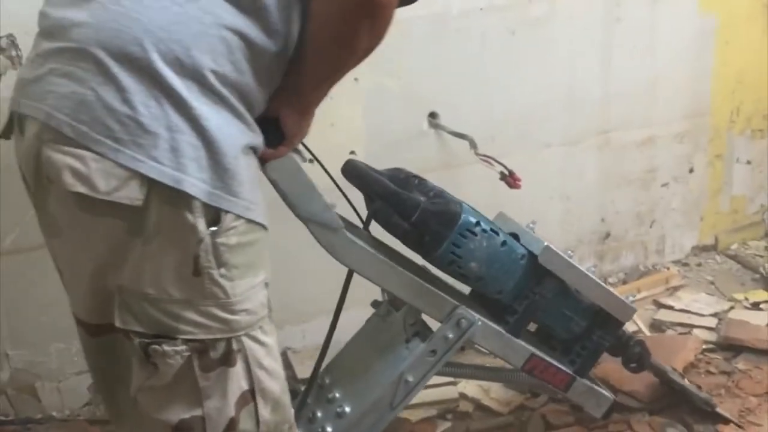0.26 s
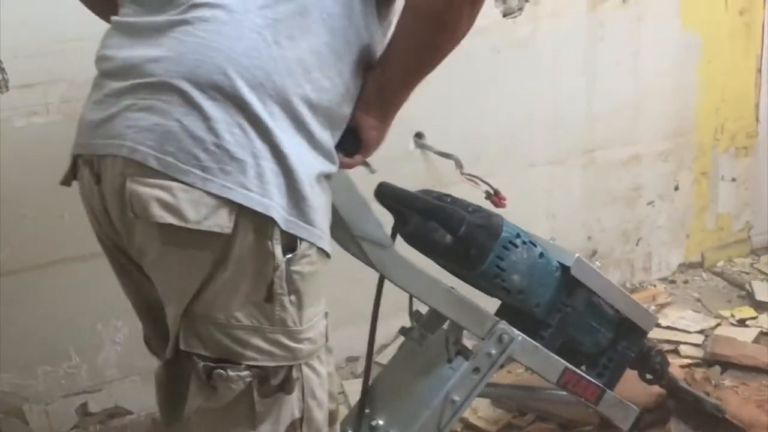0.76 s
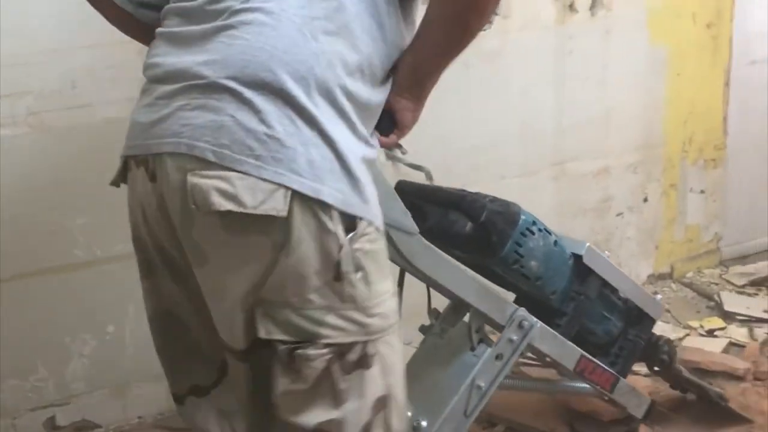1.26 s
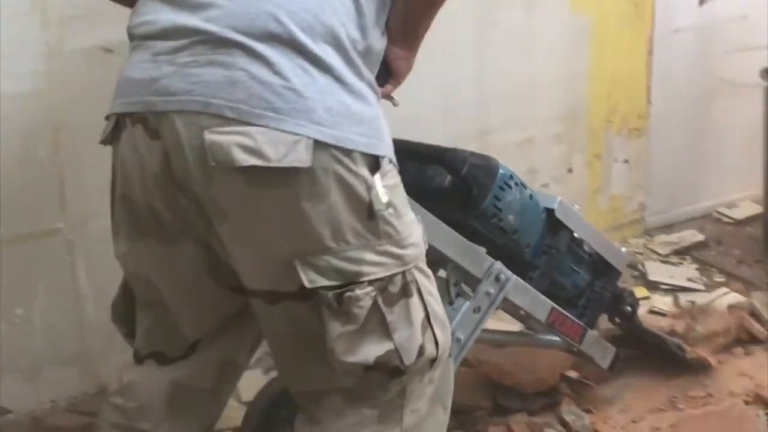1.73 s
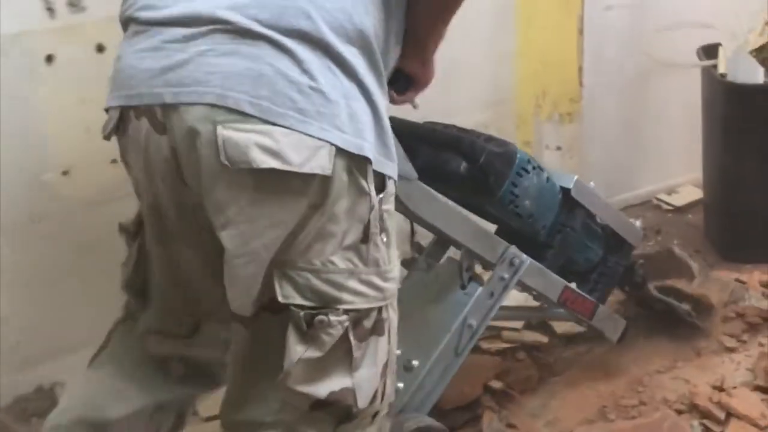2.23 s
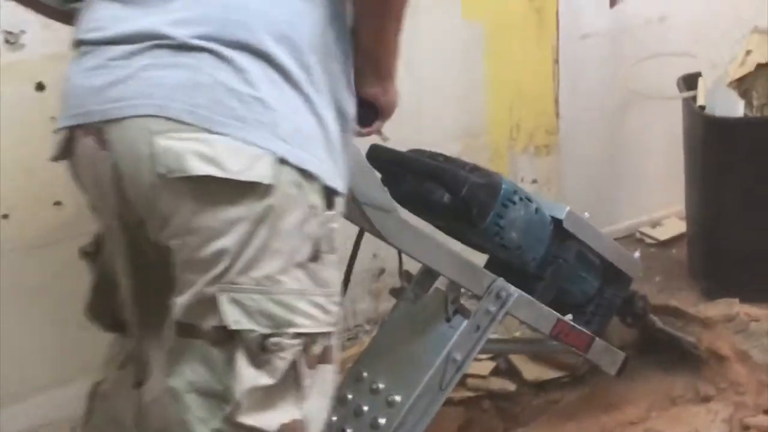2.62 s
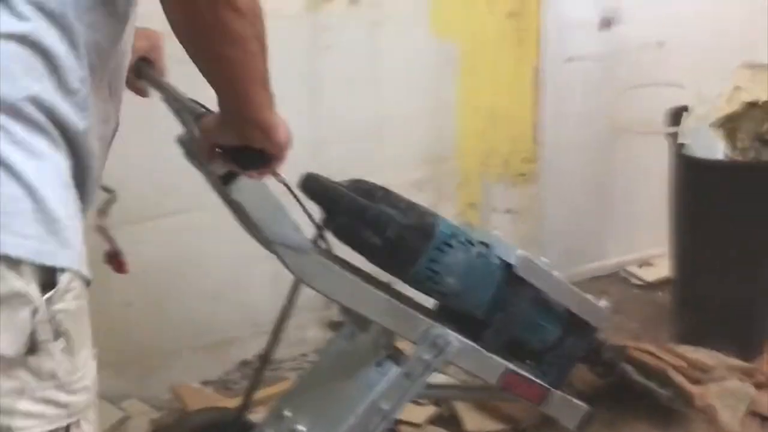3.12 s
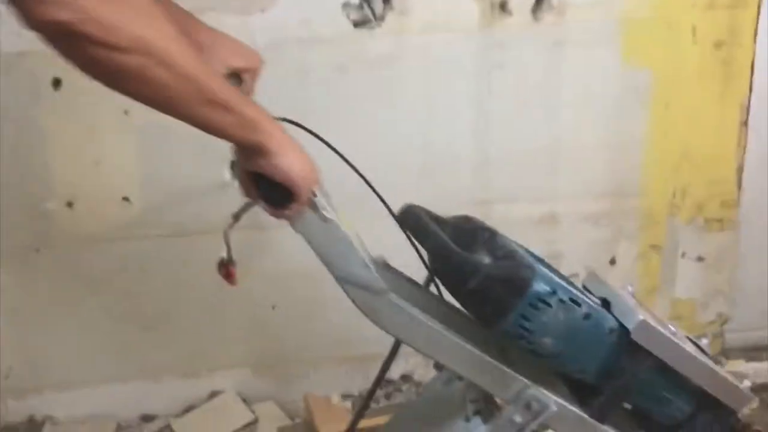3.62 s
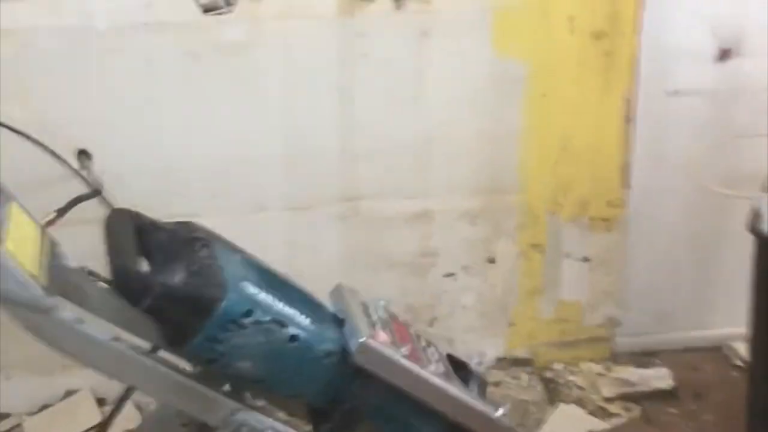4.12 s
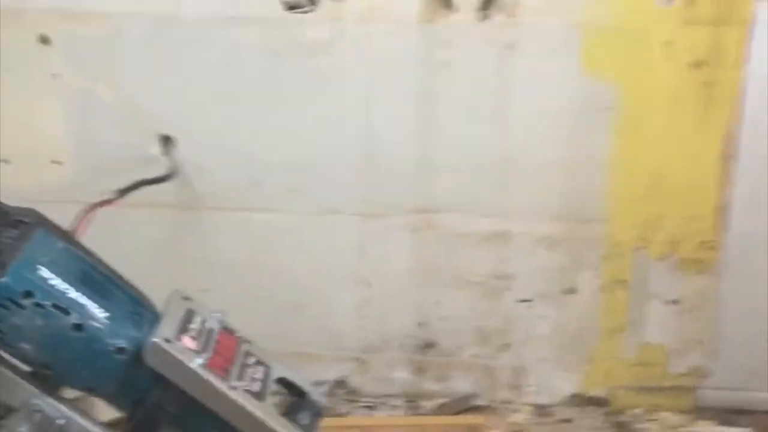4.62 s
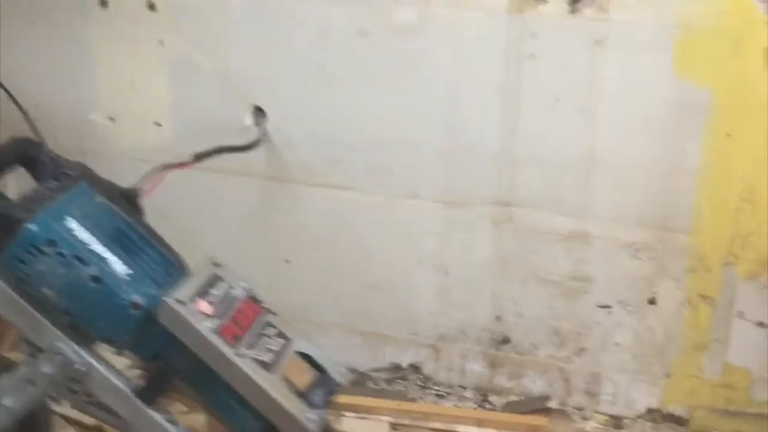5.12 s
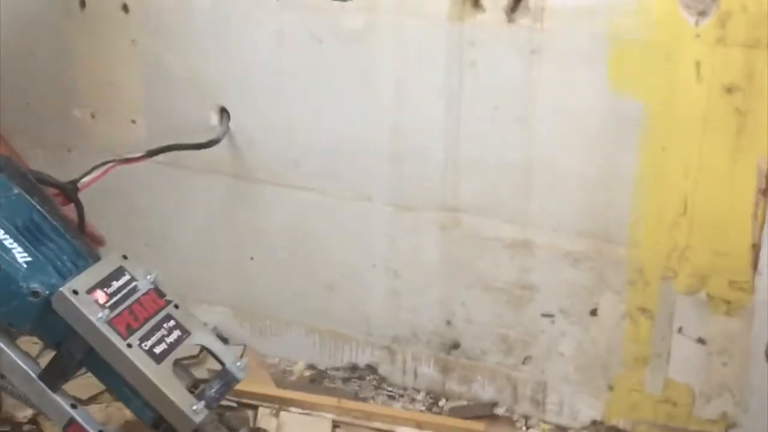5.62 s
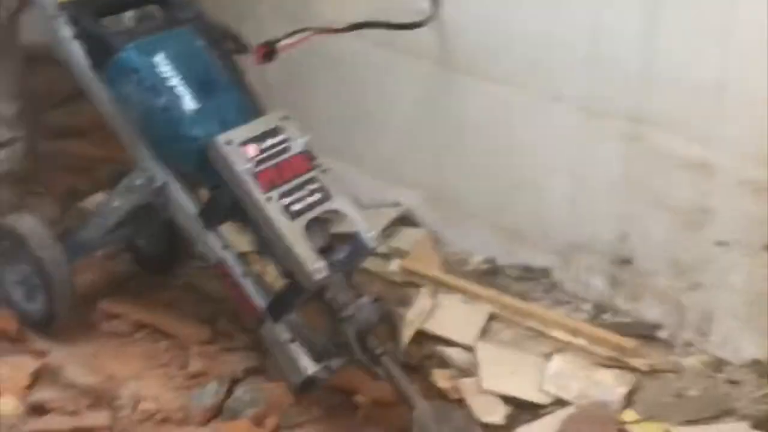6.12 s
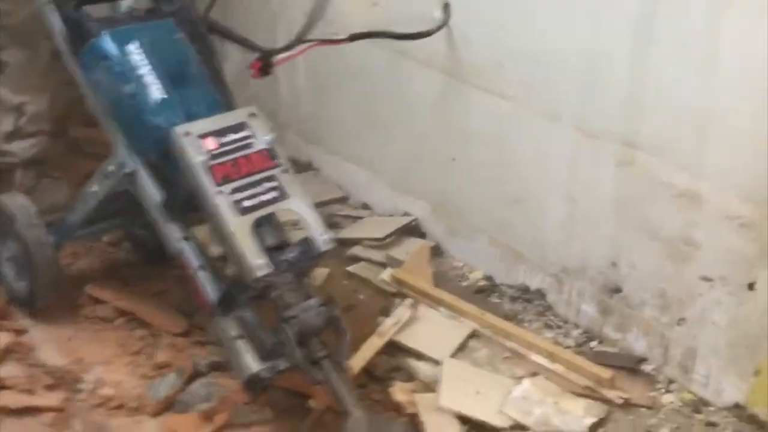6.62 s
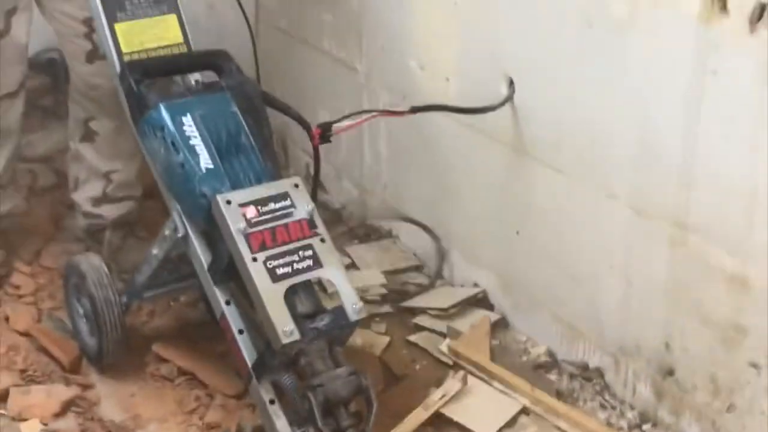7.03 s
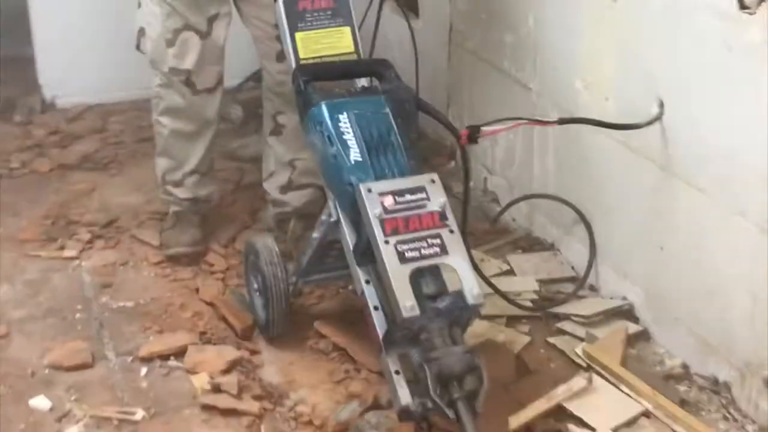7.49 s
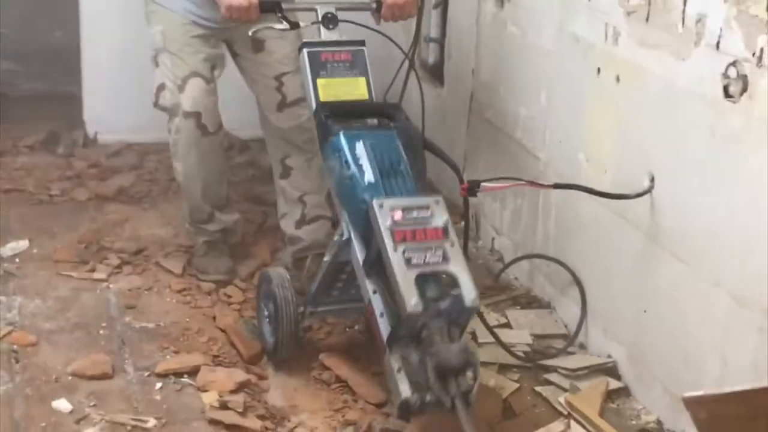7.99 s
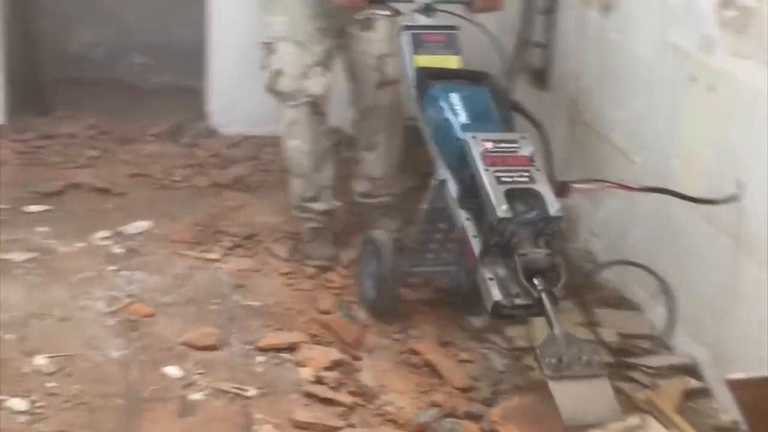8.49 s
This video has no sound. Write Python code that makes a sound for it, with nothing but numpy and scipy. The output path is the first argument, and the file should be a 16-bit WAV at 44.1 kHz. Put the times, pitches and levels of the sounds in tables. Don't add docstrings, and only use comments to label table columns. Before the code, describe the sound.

One handheld microphone close to an electric hammer chipping floor tiles indoors. Brief free-running clatter gives way to machine-gun bursts of brittle cracks with steel ringing, slab thuds and debris, separated by tiny gaps. Then the blows stop and the machine keeps knocking and whining, its cart jingling with a clear ringing tone, getting more plate-like in the bare room's echo.

```python
import sys
import numpy as np
from scipy import signal
from scipy.fft import rfft, irfft, next_fast_len
from scipy.io import wavfile
from scipy.ndimage import uniform_filter1d

SR = 44100
rng = np.random.default_rng(int(sys.argv[2]) if len(sys.argv) > 2 else 0)


def boost(x):
    u = np.asarray(x, float) / 20
    return 10 ** u


def inscribe(sig):
    pcm = np.round(np.clip(np.atleast_2d(sig).T, -1, 1) * 32767)
    wavfile.write(sys.argv[1], SR, pcm.astype(np.int16))


N = 385875
T = np.arange(N) / SR
RECOVER_FROM_S = 3.57


def rms_one(x):
    return x / np.sqrt(np.mean(x ** 2) + 1e-20)


def at_hz(points, hz):
    f, value = np.array(points).T[:2]
    return np.interp(np.log(hz + 1), np.log(f), value)


def coloured(x, spectrum):
    size = next_fast_len(N)
    gain = boost(at_hz(spectrum, np.fft.rfftfreq(size, 1 / SR)))
    return rms_one(irfft(rfft(x, size) * gain, size)[:N])


def resonate(x, hz, width_hz):
    r = np.exp(-np.pi * width_hz / SR)
    poles = [1, -2 * r * np.cos(2 * np.pi * hz / SR), r * r]
    return signal.lfilter([1, 0, -1], poles, x + 1e-18) * (1 - r * r) / 2


def resonate_twice(x, hz, width_hz):
    return resonate(resonate(x, hz, width_hz), hz, width_hz)


def drift(rate_hz):
    r = np.exp(-2 * np.pi * rate_hz * 40 / SR)
    slow = signal.lfilter([1], [1, -2 * r, r * r], rng.standard_normal(N // 40 + 2002))[2000:]
    return np.interp(np.arange(N) / 40, np.arange(len(slow)), rms_one(slow - slow.mean()))


def grit(per_s, spread_db):
    sizes = boost(spread_db * np.minimum(rng.exponential(1, N), 5)) * rng.choice([-1, 1], N)
    return rms_one(sizes * (rng.random(N) < per_s / SR))


def dying(s, levels, t60):
    marks = np.zeros(N)
    marks[(s * SR).astype(int)] = levels
    return signal.lfilter([1], [1, -boost(-60 / (t60 * SR))], marks)


def swells(rows, width_s):
    return sum(db * np.exp(-((T - s) / width_s) ** 2) for s, db in rows)


# first t/s, last t/s, crack peak level/dB, slab thud relative level/dB, drag of last blow/s
BURSTS = [
    (0.6216, 0.797, -4.5, -9.5, 0.0072),
    (0.844, 1.18, -10, -11, .008),
    (1.3415, 1.475, -5, -22, 0.012),
    (1.7572, 1.9883, -6.5, -28.5, 0.021),
    (2.09, 2.9226, -10.5, -13, .006),
    (3.1177, 3.335, -9.5, -16, 0.0094),
]
# t/s, crack peak level/dB
STRAY_BLOWS = [
    (0.5676, -15.5),
    (1.215, -28.5),
    (1.295, -25),
    (1.515, -34),
    (1.71, -24.5),
]


def blows():
    blows_per_s, late_s, soft_db = 23.7, .003, 5
    drag_blows, soft_db_per_ms = 1.4, .5
    rows = [(s, db, -20, db - 1.5) for s, db in STRAY_BLOWS]
    ended = STRAY_BLOWS[0][0]
    for first, last, level_db, thud_db, drag_s in BURSTS:
        k = np.arange(round((last - first - drag_s) * blows_per_s) + 1)
        chance = rng.standard_normal((len(k), 4))
        opening = (k == 0) * (first - ended > 2 / blows_per_s)
        drag = drag_s * np.exp((k - k[-1]) / drag_blows)
        even = np.linspace(first - late_s * opening[0] - drag[0], last - drag_s, len(k))
        scatter = 0.0011 * chance[:, 0] * (k > 0) * (k < k[-1])
        s = even + late_s * opening + drag + scatter
        loss_db = soft_db * opening + soft_db_per_ms * drag / .001 + 1.5 * chance[:, 1]
        debris_db = level_db - 7.5 - 0.64 * loss_db - 1 * opening + 1.5 * chance[:, 3]
        rows += zip(s, level_db - loss_db, thud_db + 7.5 * chance[:, 2], debris_db)
        ended = last
    return np.transpose(rows)


def tile_crack(s, crack_db):
    onset = dying(s, boost(crack_db + 1), 0.028) - dying(s, boost(crack_db + 2), 0.0027)
    crack = rng.standard_normal(N) * onset
    luck = rng.standard_normal((len(s), 2))
    bounce_s = .009 * boost(3.0 * luck[:, 0])
    again = dying(s + bounce_s, boost(crack_db - 6.5 + 2.8 * luck[:, 1]), 0.025)
    first = np.abs(s[:, None] - np.array(BURSTS)[2:, 0]).min(1) < 1e-3
    tick = dying(s, first * boost(crack_db), 0.0095)
    return crack + rng.standard_normal(N) * (again + tick)


# f/Hz, width/Hz, level/dB
CHISEL = [(1900, 130, -6.5), (3060, 310, 0.5), (3860, 88, -13), (4236, 110, -1.5), (4800, 89, 3),
          (5750, 160, -1.5), (6750, 170, -7), (7650, 180, -0.5), (9630, 230, -8.5), (11400, 180, -1),
          (12600, 200, -25)]


def chisel_ring(push):
    return sum((-1) ** k * boost(db) * resonate(push, hz, width) * np.sqrt(1000 / width)
               for k, (hz, width, db) in enumerate(CHISEL))


# f/Hz, spectral density level/dB per Hz
SHATTER = [(18, -65), (30, -26.5), (455, -20.5), (694, -3.5), (1210, -8.5), (2220, -5.5), (3050, -4),
           (3570, -4), (4770, -5), (5160, -2.5), (14100, -25), (15200, -20), (16500, -41)]


def flying_shards(clatter):
    return coloured(grit(8000, spread_db=3.0), SHATTER) * clatter


def slab_thud(s, thud_db):
    push = rng.standard_normal(N) * dying(s, boost(thud_db), 0.16)
    return resonate_twice(push, 740, 580)


def chipping():
    s, crack_db, thud_db, debris_db = blows()
    crack = tile_crack(s, crack_db)
    clatter = dying(s, boost(debris_db), 0.18)
    debris = grit(6000, spread_db=2.5) * clatter
    bright = signal.sosfilt(signal.butter(2, 2500, "high", fs=SR, output="sos"), crack)
    steel = chisel_ring(crack + 0.67 * debris)
    slab = slab_thud(s, crack_db + thud_db)
    boom = resonate_twice(debris, 290, 126)
    direct = boost(-2.5) * bright + boost(-2) * flying_shards(clatter) + boost(0.5) * steel
    direct = direct + boost(6.5) * slab + boost(-2) * boom
    return direct + boost(-2.0) * room(direct)


# f/Hz, spectral density level/dB per Hz
RATTLE = [(18, -60), (30, -34.5), (350, -13.5), (409, -15.5), (858, -5.5), (1240, -8.5), (1340, -5.5),
          (1450, -9.5), (3210, -5), (3970, -8.5), (4530, -2.5), (4900, -10.5), (14100, -28), (15200, -26),
          (16500, -64)]
# f/Hz, width/Hz, level/dB
FRAME = [(1953, 66, -24.5), (3175, 160, -16), (4500, 100, -41), (5400, 220, -25), (6090, 120, -19.5),
         (8380, 1100, -17), (11640, 440, -26.5)]


def frame_rattle(contacts, plate_db):
    body = coloured(contacts, RATTLE)
    body = body + sum(boost(db) * rms_one(resonate(contacts, hz, width)) for hz, width, db in FRAME)
    body = body + boost(plate_db - 5.0) * rms_one(resonate_twice(contacts, 1093, 450))
    return rms_one(boost(-1.5) * rms_one(body) + rms_one(room(body)))


def cart_plate(contacts, plate_db):
    pair = resonate(contacts, 1097, 30) - boost(-0.5) * resonate(contacts, 1019, 35)
    return boost(plate_db - 10.5) * rms_one(pair)


# t/s, level above its hum/dB
JOLTS = [(.52, 6), (3.92, 17), (4.13, 13), (4.37, 5), (4.58, 2), (5.15, 6), (5.75, 4), (6.0, 6), (6.5, 9),
         (7.22, 9), (7.6, 9.5), (7.87, 12), (8.1, 7.5), (8.4, 10), (8.55, 9.5)]


def cart_tube(contacts, freed):
    rise_s = np.minimum(freed, 5.97 - RECOVER_FROM_S)
    ring_db = -18.5 + 4.5 * rise_s + swells(JOLTS, .051)
    tube = resonate(contacts, 1354, 11)
    power = uniform_filter1d(rms_one(tube) ** 2 + .05, size=3000)
    return boost(ring_db - 4.1) * rms_one(tube / power ** 0.29)


# t/s, level/dB
WHINE_SWELLS = [
    (.08, 8),
    (4.13, 5),
    (4.55, 5),
    (5.41, 4.5),
    (5.62, 11.5),
    (6.52, 3),
    (6.9, 7),
    (7.54, 3),
]


def gear_whine(freed, ducked, turn):
    hz = np.where(freed > 0, 4704 - 30 * freed, 4676)
    db = -28.5 - 22.5 * ducked - 0.55 * freed + swells(WHINE_SWELLS, .078)
    cycles = np.cumsum(hz + 9.96 * drift(26.6) + 14 * drift(1.5)) / SR
    mesh = 2 * np.pi * cycles + 0.5 * np.sin(2 * np.pi * turn)
    return boost(db + 2.0 + 3.8 * drift(27.0)) * np.sin(mesh)


# f/Hz, width/Hz, relative level/dB
HUM = [(63.6, 12, -42.5), (256.4, 5.3, -43.5), (169, 9.4, -48.5)]


def floor_hum(contacts):
    rise_db = 1.5 * np.abs(T - RECOVER_FROM_S)
    return sum(boost(db + rise_db) * rms_one(resonate_twice(contacts, hz, width)) for hz, width, db in HUM)


def free_running():
    freed = np.maximum(T - RECOVER_FROM_S, 0)
    ducked = (1 - np.exp(-np.maximum(T - 0.78, 0) / 0.14)) * np.exp(-freed / 0.32)
    level_db = -17.5 - 16.5 * ducked
    plate_db = np.interp(T, [5.93, 5.96], [-22.5, -8.5]) + 2.0 * drift(2.2)
    turn = np.cumsum(23.6 * (1 + .012 * drift(3.0))) / SR + .3
    knock = np.exp(-(turn % 1) / 0.21) + 0.38 * np.exp(-((turn + .47) % 1) / 0.21)
    shake = boost(1.3 * drift(14.0)) * (0.49 + knock)
    contacts = rms_one(grit(5000, spread_db=3.0) * shake)
    machine = frame_rattle(contacts, plate_db) + cart_plate(contacts, plate_db)
    machine = machine + cart_tube(contacts, freed) + floor_hum(contacts)
    return boost(level_db - 0.89) * machine + gear_whine(freed, ducked, turn)


# t/s, level/dB
SLAB_FALLS = [
    (.77, -42),
    (1.17, -46),
]


def falls():
    low = rms_one(resonate_twice(rng.standard_normal(N), 65, 50))
    return low * sum(boost(db) * np.exp(-((T - s) / .05) ** 2) for s, db in SLAB_FALLS)


# t/s, peak level/dB
PUFFS = [
    (1.884, -28),
    (2.257, -24),
    (2.298, -24),
    (2.422, -21),
]


def puffs():
    out, t = np.zeros(N), np.arange(int(.09 * SR)) / SR
    cycles = 45 * t + 1.53 * (1 - np.exp(-t / 0.0031))
    swing = np.sin(2 * np.pi * cycles) * np.exp(-t / 0.015)
    for s, db in PUFFS:
        start = int(s * SR)
        out[start:start + len(t)] += boost(db) * swing
    return out


# f/Hz, T60/s
ROOM = [(100, 0.95), (500, 0.93), (2000, 0.76), (5000, 0.77), (10000, 0.52), (16000, 0.28)]


def room(x):
    step_s = .3
    t = np.arange(SR) / SR
    white, edges, tails = rng.standard_normal((2, 5, SR)), 40 * 2 ** np.arange(0, 9, .5), 0
    for k, (low, high) in enumerate(zip(edges, edges[1:])):
        band = signal.sosfilt(signal.butter(2, [low, high], "band", fs=SR, output="sos"), white[k % 2])
        tails = tails + band * boost(-60 * t / at_hz(ROOM, np.sqrt(low * high)))
    tails = tails * np.clip(t / 0.0049, 0, 1)
    tails = tails / np.sqrt(np.sum(tails ** 2, 1, keepdims=True))
    away = (T / step_s - np.arange(5)[:, None] + 1) % 5 - 1
    shares = np.cos(np.pi / 2 * np.minimum(np.abs(away), 1))
    size = next_fast_len(N + SR)
    return irfft(np.sum(rfft(x * shares, size) * rfft(tails, size), 0), size)[:N]


def scene():
    return np.tile(chipping() + free_running() + falls() + puffs(), (2, 1))


def top_cut(x):
    return signal.sosfilt(signal.butter(12, 16800, fs=SR, output="sos"), x)


def record(dry):
    limit, cutoff_hz = 0.72, 15950
    rounded = dry / (1 + np.abs(dry / limit) ** 3) ** (1 / 3)
    low_pass = signal.ellip(12, .5, 70, cutoff_hz * .99, fs=SR, output="sos")
    mix = signal.sosfilt(low_pass, rounded)
    return top_cut(mix)


dry = scene()
out = record(dry)
inscribe(out)
```